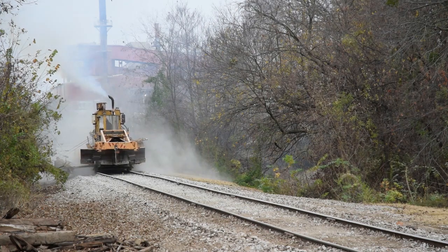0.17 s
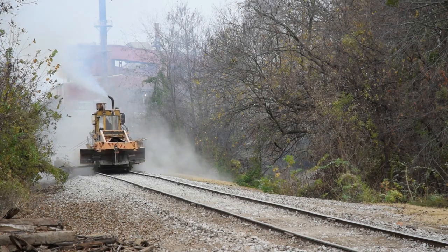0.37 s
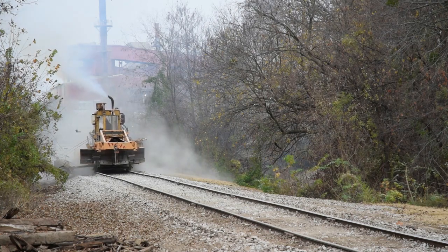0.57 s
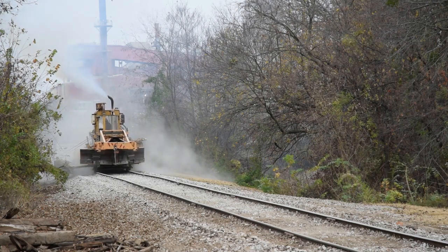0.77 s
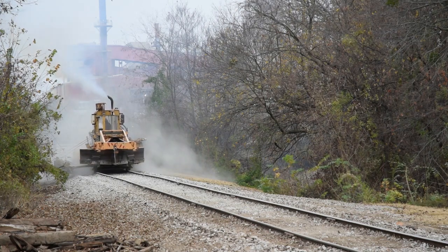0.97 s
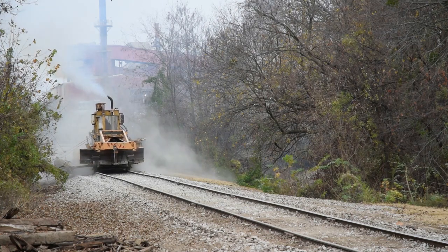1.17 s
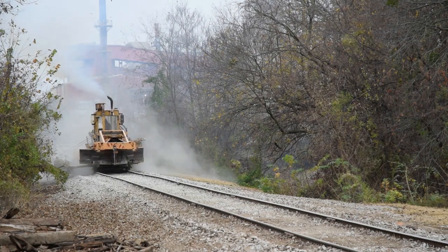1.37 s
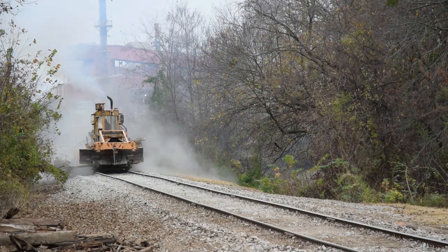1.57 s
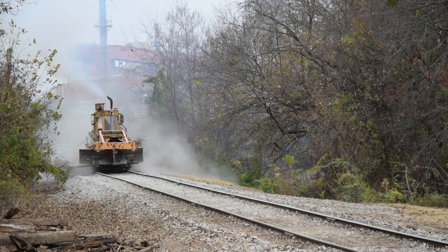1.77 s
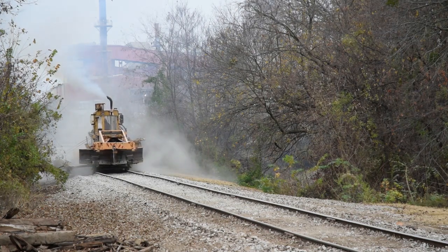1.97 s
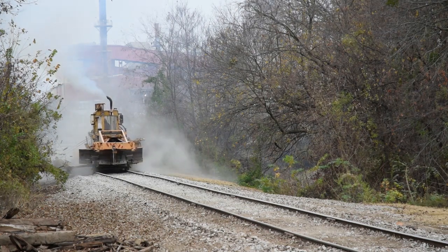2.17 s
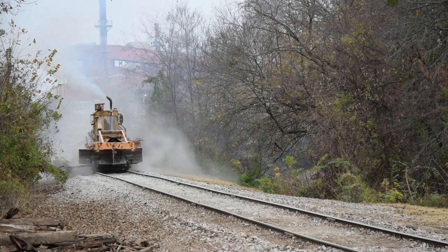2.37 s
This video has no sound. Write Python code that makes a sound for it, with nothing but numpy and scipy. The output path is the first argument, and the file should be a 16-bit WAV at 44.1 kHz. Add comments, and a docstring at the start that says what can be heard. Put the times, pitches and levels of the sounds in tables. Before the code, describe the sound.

Steady fast engine drone of a heavy track machine, with throbbing knocks, dull low surges, faint whines and gritty rushing gravel throughout; short high squeaks near half a second and one second, open air, distant stereo microphone.

```python
"""A diesel ballast machine works along a railway track some way off, its engine running fast.
The exhaust drones and the block clatters, both as wavering multiples of one engine cycle.
Shaped noise gives an uneven low rumble and the rush of ballast; short noisy rings are single stones.
Faint whines hold on and a metal part squeals on and off, as narrow tones.
Two closely spaced microphone ports pick it up, with diffuse scatter from the trees and air on the ports."""
import sys
import numpy as np
from scipy import signal
from scipy.fft import rfft, irfft, next_fast_len
from scipy.io import wavfile

SR = 44100
rng = np.random.default_rng(int(sys.argv[2]) if len(sys.argv) > 2 else 0)


def file_out(sig):
    """Save sig as 16-bit WAV at sys.argv[1]."""
    # one column per channel
    cols = np.atleast_2d(sig).T
    # limit, then scale
    lim = np.clip(cols, -1, 1)
    pcm = np.round(lim * 32767).astype(np.int16)
    wavfile.write(sys.argv[1], SR, pcm)


N = 110691

# Faint whines of the machinery: f/Hz, width f/Hz (sets wander and flutter), level/dB
WHINES = [(1965, 12, -47), (2287, 7, -40), (2324, 8, -42.5), (2552, 16, -42), (2635, 30, -45),
          (4084, 30, -47), (4761, 12, -43)]
# Engine speed: t/s, working cycle rate f/Hz
ENGINE_SPEED = [(0.0, 24.64), (0.1, 24.52), (0.22, 24.15), (0.38, 24.38), (0.5, 24.63), (0.68, 24.35),
                (0.93, 24.6), (1.08, 24.44), (1.25, 24.12), (1.55, 24.02), (1.66, 24.23), (1.78, 24.71),
                (1.9, 24.78), (2.1, 23.84), (2.2, 24.0), (2.32, 24.44), (2.51, 24.42)]
# Exhaust lines: multiple of the cycle rate, level/dB before the load changes
EXHAUST_LINES = [(3, -32), (4, -40), (6, -25.5), (7, -32), (8, -38), (9, -36), (10, -44), (12, -22.5),
                 (15, -39.5)]
# Exhaust drone as the load changes: t/s, gain level/dB
DRONE_LEVEL = [(0, -.5), (.2, -1), (.42, .5), (.5, 2.3), (.57, .3), (.66, -2), (.74, 1), (1.0, 0),
               (1.09, 2.2), (1.2, .3), (1.32, -2.8), (1.42, -.8), (1.52, -2.6), (1.7, 0), (1.8, 2),
               (1.87, -.6), (2.02, 0), (2.22, -2), (2.37, 1.3), (2.51, -.3)]
# Noisy knocking of the block, relative spectrum: f/Hz, level/dB per Hz
KNOCK_SPECTRUM = [(300, -37), (500, -9.5), (800, -12), (1000, -11.5), (1250, 0.5), (1600, -3), (2200, -7),
                  (4000, -6), (9000, -67)]
# Throb of the knocking: multiple of the cycle rate, depth (in the natural log of the gain)
KNOCK_THROB = [(1, 0.06), (3, 0.21), (7, 0.32), (10, 0.33)]
# Rise and fall of the clatter: t/s, gain level/dB
CLATTER_LEVEL = [(0, -3), (.35, 1.5), (.45, -2), (.8, -1.5), (.97, -4), (1.12, 1), (1.4, 1.5), (1.68, 2),
                 (1.87, -2), (2.15, 1), (2.42, 3)]
# Whining lines of the engine block: multiple of the cycle rate, level/dB before resonance and clatter level
BLOCK_LINES = [(36, -48), (38, -43), (39, -45.5), (40, -47), (41, -40.5), (42, -41.5), (44, -41.5),
               (45, -42.5), (47, -46), (48, -38.5), (49, -43), (51, -41), (52, -43.5), (53, -47), (55, -46),
               (56, -44.5), (59, -44.5), (60, -47), (66, -45), (67, -47)]
# Block resonances the lines slide across: f/Hz, half-width f/Hz, boost level/dB
BLOCK_RINGS = [(1006, 12, 9.5), (1077, 10, 3.5), (1174, 12, 5), (1249, 12, 3)]
# Low rumble, relative spectrum: f/Hz, level/dB per Hz
RUMBLE_SPECTRUM = [(15, -34), (30, -13), (55, -4), (95, -1), (150, 0), (200, -2.5), (260, -2), (320, -4.5),
                   (420, -14.5), (600, -35), (1500, -65)]
# Unevenness of the rumble: t/s, level/dB before RUMBLE_DB
RUMBLE_LEVEL = [(0, -24.5), (.3, -21.5), (.55, -24), (.78, -25.5), (.95, -24.5), (1.15, -22.5), (1.4, -20),
                (1.75, -24), (1.93, -26), (2.03, -22), (2.3, -23), (2.51, -25)]
# Dull surges in the rumble: peak t/s, length t/s, centre f/Hz, level/dB before SURGE_DB
SURGES = [(.02, .06, 130, -21), (.205, .05, 210, -20), (.225, .08, 105, -20), (.38, .09, 160, -15.5),
          (.64, .08, 245, -18.5), (.67, .06, 125, -21), (.715, .07, 160, -17), (.85, .09, 150, -17),
          (.93, .12, 100, -22.5), (1.02, .07, 125, -18), (1.08, .06, 175, -21), (1.245, .08, 150, -15),
          (1.67, .08, 180, -18.5), (1.81, .08, 205, -18), (2.08, .06, 85, -23), (2.16, .06, 150, -20),
          (2.22, .08, 125, -17)]
# Rush of stones and machinery, relative spectrum: f/Hz, level/dB per Hz
RUSH_SPECTRUM = [(200, -13), (450, -6.5), (750, -4.5), (1000, -5.5), (1250, -6.5), (1500, -6), (1650, -4),
                 (1850, -6.5), (2100, -6.5), (2240, 0), (2430, -7), (2560, 2.5), (2850, -2), (3300, 0.5),
                 (3580, 0), (3760, -8.5), (3920, -1.5), (4280, 0), (4450, -4.5), (4800, -2.5), (5100, -1),
                 (5600, -3.5), (6400, -5), (7300, -13.5), (8050, -7.5), (8500, -32), (9800, -16),
                 (11000, -40.5), (15000, -36.5)]
# Rise and fall of the rush: t/s, level/dB before the rush and rattle gains
RUSH_LEVEL = [(0, -23.5), (.09, -25), (.17, -23), (.3, -22.5), (.45, -23), (.53, -21.5), (.58, -24),
              (.63, -22), (.67, -25), (.7, -22.5), (.78, -22.5), (.9, -24), (.99, -24.5), (1.1, -24),
              (1.19, -22), (1.31, -25), (1.38, -22.5), (1.55, -22), (1.66, -22.8), (1.79, -22),
              (1.87, -23.5), (1.95, -22), (2.0, -24), (2.05, -22), (2.13, -24), (2.36, -22.5), (2.51, -24)]
# Spills of stones swelling out of the rush: peak t/s, length t/s, rise level/dB
SPILLS = [(.555, .04, 3), (1.137, .055, 3.8), (1.455, .08, 2.6), (1.82, .05, 3), (2.07, .055, 3.2)]
# Air on the ports and rush scattered by the trees, relative spectrum: f/Hz, level/dB per Hz
SCATTER_SPECTRUM = [(20, -2), (60, 5), (125, 4), (250, -31), (500, -12), (1200, -1.5), (3000, 6), (4500, 5),
                    (6200, -10.5), (8100, -26), (8700, -63), (10000, -36), (12500, -14.5), (15000, -49)]
# Squeals of rubbing metal: start t/s, length t/s, pitch f/Hz, level/dB before the fade
SQUEALS = [(.138, .02, 2570, -24), (.165, .08, 2551, -31), (.492, .026, 2312, -25),
           (.52, .024, 2316, -25.5), (.548, .02, 2318, -27), (.572, .022, 2326, -28.5),
           (.475, .22, 4761, -35), (.928, .034, 2281, -21.5), (.96, .07, 2288, -24.5),
           (1.13, .075, 2284, -29), (1.236, .04, 2290, -30), (1.3, .09, 2292, -31.5), (1.7, .12, 4761, -37)]
# The two microphone ports: f/Hz, left minus right level/dB, left lead (radians)
PORTS = [(900, -0.2, 0.15), (1500, -0.8, 0.26), (2660, 0, 0.39), (3320, -8, 0.71), (4100, -4.5, 1.53),
         (4694, -13, 1.7), (4990, 0, 3.6), (5360, 5.5, 3.2), (5900, 9, 2.5), (5860, 30, 2), (6710, -1, 1.2),
         (7100, 5, 2.3), (7000, -5, 1.8), (8200, -2.5, 2.77), (10100, 2, 2.5), (12000, 0, 1.05)]

# gains in dB
KNOCK_DB, RUMBLE_DB, SURGE_DB, RUSH_DB, RATTLE_DB, SCATTER_DB = -31, -4, -3, -1, -7, -32.5
# surge band: spread in octaves, low cut in Hz
SURGE_OCTAVES, SURGE_LOW_HZ = .45, 85
# stones: average number per second, mean rise in dB before a cap, time to ring down 60 dB
STONES_PER_S, STONE_SPREAD_DB, STONE_T60_S = 800, 3.8, .016
# squeals: onset, change in level over the length, ending
SQUEAL_ATTACK_S, SQUEAL_FADE_DB, SQUEAL_RELEASE_S = .007, -3, .01
# below PORTS_ALIKE_HZ the ports hear the machine alike; CUTOFF_HZ is the recorder's upper limit
PORTS_ALIKE_HZ, CUTOFF_HZ = 450, 15500


def amp(db):
    """Decibels to gain."""
    return 10 ** (np.asarray(db) / 20)


def unit(x):
    """Scales to rms 1."""
    return x / np.sqrt(np.mean(abs(x) ** 2) + 1e-20)


def curve(points):
    """A control curve, one value per sample."""
    return np.interp(np.arange(N) / SR, *np.transpose(points))


def read(points, hz, axis=1):
    """Reads one column of a table on a log-frequency axis."""
    table = np.transpose(points)
    return np.interp(np.log(hz + 1), np.log(table[0] + 1), table[axis])


def colour(x, points):
    """Filters a sound by a spectrum table, to rms 1."""
    gain = amp(read(points, np.fft.rfftfreq(N, 1 / SR)))
    return unit(irfft(rfft(x) * gain, N))


def drift(rate_hz):
    """Chance wandering at rms 1, low-passed at rate_hz."""
    count = 2048
    hz = np.fft.rfftfreq(count, N / SR / count)
    lowpass = 1 / np.sqrt(1 + (hz / rate_hz) ** 4)
    slow = irfft(rfft(rng.standard_normal(count)) * lowpass)
    return unit(np.interp(np.linspace(0, count - 1, N), np.arange(count), slow))


def swell(peak, length):
    """A smooth rise and fall around one moment, height 1."""
    position = (np.arange(N) / SR - peak) / length
    return np.cos(np.pi * np.clip(position, -.5, .5)) ** 2


def lines(table, cycles, waver, waver_hz, slip):
    """Multiples of the engine cycle, each wavering in strength and timing (slip in radians rms)."""
    out = np.zeros(N)
    for multiple, db in table:
        strength = np.sqrt(2) * amp(db) * (1 + waver * drift(waver_hz))
        phase = 2 * np.pi * (round(multiple) * cycles + rng.random())
        out += strength * np.cos(phase + slip * drift(waver_hz))
    return out


def whines(flutter=.45):
    """Machinery whines as narrow tones, unsteady in pitch and strength."""
    out = np.zeros(N)
    for hz, width, db in WHINES:
        strength = np.sqrt(2) * amp(db) * unit(1 + flutter * drift(width))
        pitch = hz + width * drift(2 * width) / 2
        out += strength * np.cos(2 * np.pi * (np.cumsum(pitch) / SR + rng.random()))
    return out


def exhaust(cycles):
    """Exhaust pulses repeat with the engine cycle; their harmonics make a drone that follows the load."""
    return amp(curve(DRONE_LEVEL)) * lines(EXHAUST_LINES, cycles, waver=0.1, waver_hz=13, slip=0.018)


def block_knocks(cycles):
    """Noise of the block, throbbing in step with the engine cycle."""
    log_gain = np.zeros(N)
    for multiple, depth in KNOCK_THROB:
        log_gain += depth * np.cos(2 * np.pi * (round(multiple) * cycles + rng.random()))
    knocks = colour(np.exp(log_gain) * rng.standard_normal(N), KNOCK_SPECTRUM)
    return amp(KNOCK_DB + curve(CLATTER_LEVEL)) * knocks


def block_lines(speed, cycles, follow=0.73):
    """High multiples of the cycle rate bend with the speed and swell as they cross the block's resonances."""
    out = np.zeros(N)
    for multiple, db in BLOCK_LINES:
        ring_db = sum(boost / (1 + ((round(multiple) * speed - hz) / width) ** 2)
                      for hz, width, boost in BLOCK_RINGS)
        level = db + ring_db + follow * curve(CLATTER_LEVEL)
        out += amp(level) * lines([(multiple, 0)], cycles, waver=0.27, waver_hz=20, slip=0.18)
    return out


def engine():
    """Exhaust drone and block clatter, all locked to the same engine cycle."""
    speed = curve(ENGINE_SPEED)
    cycles = np.cumsum(speed) / SR
    return exhaust(cycles) + block_knocks(cycles) + block_lines(speed, cycles)


def rumble():
    """Uneven low roar of the working machine, as shaped noise."""
    return amp(RUMBLE_DB + curve(RUMBLE_LEVEL)) * colour(rng.standard_normal(N), RUMBLE_SPECTRUM)


def surges():
    """Short dull bursts of banded roar as the machine works against the ballast."""
    size = next_fast_len(N)
    octave = np.log2(np.fft.rfftfreq(size, 1 / SR) + 1)
    low_cut = 1 / (1 + (SURGE_LOW_HZ / 2 ** octave) ** 4)
    out = np.zeros(N)
    for peak, length, hz, db in SURGES:
        band = low_cut * np.exp(-.5 * ((octave - np.log2(hz)) / SURGE_OCTAVES) ** 2)
        # random phases turn the band into steady noise
        roar = irfft(band * np.exp(2j * np.pi * rng.random(len(band))), size)[:N]
        shape = swell(peak, length)
        out += amp(SURGE_DB + db) * unit(shape * roar) * np.sqrt(np.mean(shape ** 2))
    return out


def stone_rattle(count=28, low_hz=1500, high_hz=9000):
    """Single stones strike at random, each a brief noisy ring at one of several pitches."""
    t = np.arange(2048) / SR
    fade = np.exp(-np.log(1000) * t / STONE_T60_S)
    kind = rng.integers(0, count, N)
    struck = rng.random(N) < STONES_PER_S / SR
    hits = struck * amp(STONE_SPREAD_DB * np.minimum(rng.exponential(1, N), 4))
    rattle = np.zeros(N)
    for k, hz in enumerate(np.geomspace(low_hz, high_hz, count)):
        ring = np.sin(2 * np.pi * hz * t) + rng.standard_normal(len(t))
        rattle += signal.oaconvolve(hits * (kind == k), ring * fade)[:N]
    return rattle


def stones(flicker_db=0.84, flicker_hz=18):
    """A dense rush of tumbling ballast as shaped noise, with single stones clicking out of it."""
    rattle = stone_rattle()
    rush = amp(RUSH_DB) * colour(rng.standard_normal(N), RUSH_SPECTRUM)
    rush += amp(RATTLE_DB) * colour(rattle, RUSH_SPECTRUM)
    spills_db = sum(db * swell(peak, length) for peak, length, db in SPILLS)
    return rush * amp(curve(RUSH_LEVEL) + spills_db + flicker_db * drift(flicker_hz))


def scatter():
    """Diffuse noise, independent at each port, that follows the rush of the stones."""
    follow = unit(amp(curve(RUSH_LEVEL)))
    pair = np.array([colour(noise, SCATTER_SPECTRUM) for noise in rng.standard_normal((2, N))])
    return amp(SCATTER_DB) * follow * pair


def squeals(flutter=0.13, flutter_hz=60, waver_hz=10):
    """Rubbing metal catches suddenly, sings a wavering tone and fades."""
    out = np.zeros(N)
    for start, length, hz, db in SQUEALS:
        t = np.clip(np.arange(N) / SR - start, 0, length)
        gate = np.minimum(np.minimum(t / SQUEAL_ATTACK_S, (length - t) / SQUEAL_RELEASE_S), 1)
        pitch = hz + waver_hz * drift(flutter_hz)
        tone = np.sqrt(2) * np.sin(2 * np.pi * np.cumsum(pitch) / SR)
        strength = amp(db + SQUEAL_FADE_DB * t / length) * (1 + flutter * drift(flutter_hz))
        out += gate * strength * tone
    return out


def ports(x):
    """Each port hears the machine with its own colour and phase, at the same summed power."""
    hz = np.fft.rfftfreq(2 * N, 1 / SR)
    table = [(PORTS_ALIKE_HZ, 0, 0)] + PORTS
    ratio = amp(read(table, hz, axis=1))
    lead = read(table, hz, axis=2)
    pair = np.array([ratio * np.exp(.5j * lead), np.exp(-.5j * lead)])
    even_power = np.sqrt(2 / (1 + ratio ** 2))
    return irfft(rfft(x, 2 * N) * pair * even_power)[:, :N]


def scene():
    """The whole machine through one port response, plus diffuse scatter."""
    machine = whines() + engine() + rumble() + surges() + stones() + squeals()
    return ports(machine) + scatter()


def record(dry):
    """The recorder's band limit, a linear-phase low-pass."""
    lowpass = signal.firwin(511, CUTOFF_HZ, window=("kaiser", 9), fs=SR)
    return signal.oaconvolve(dry, lowpass[None], "same")


dry = scene()
out = record(dry)
file_out(out)
```